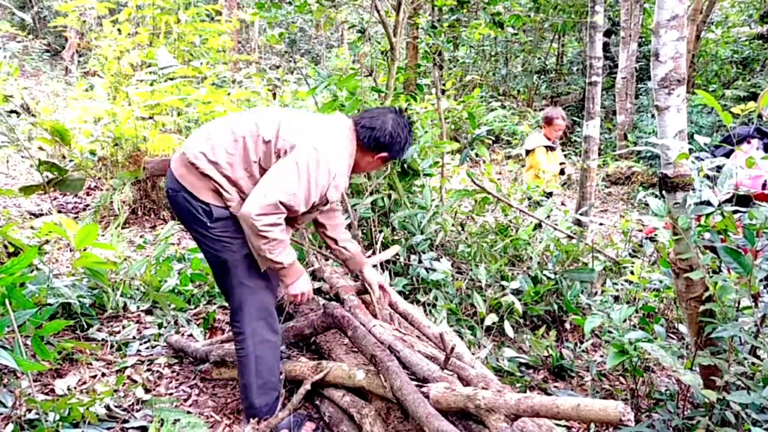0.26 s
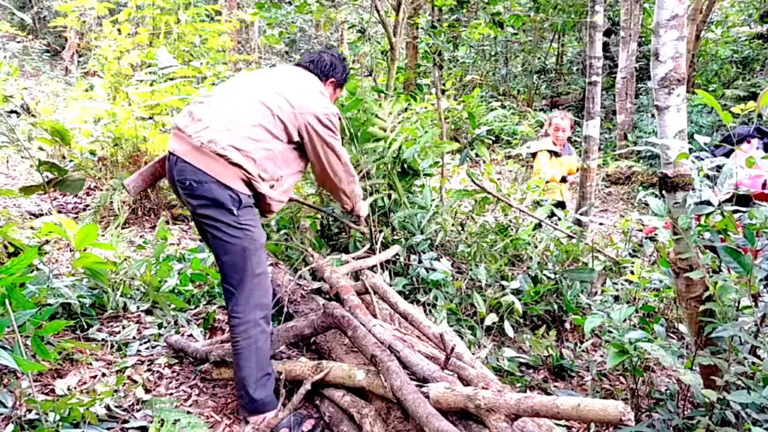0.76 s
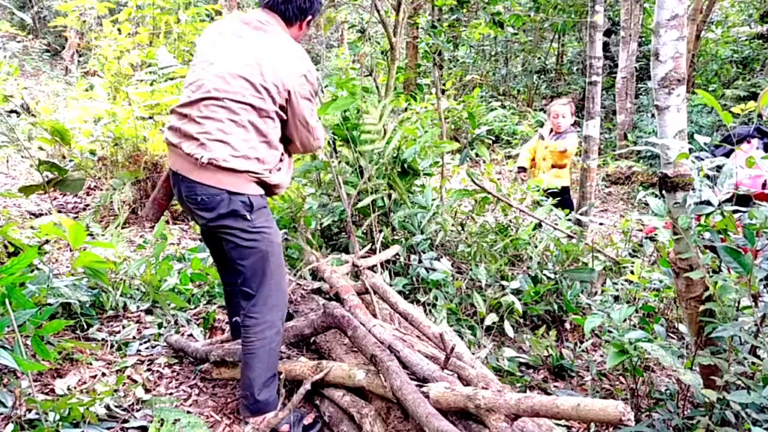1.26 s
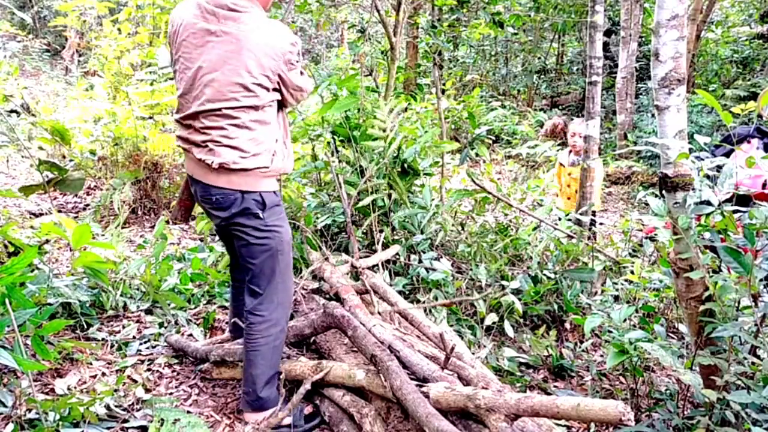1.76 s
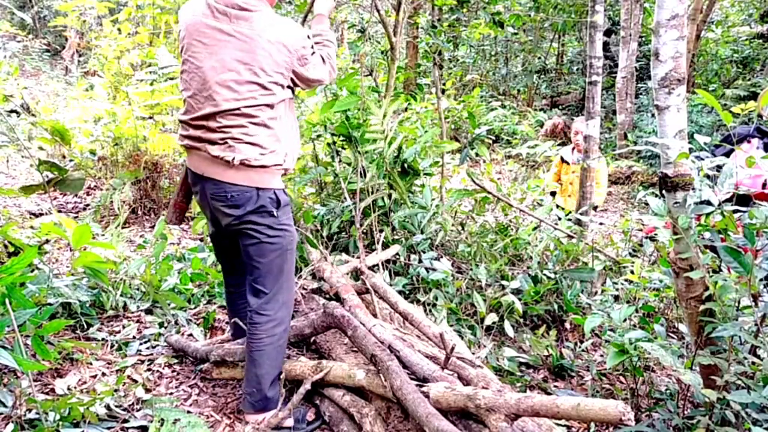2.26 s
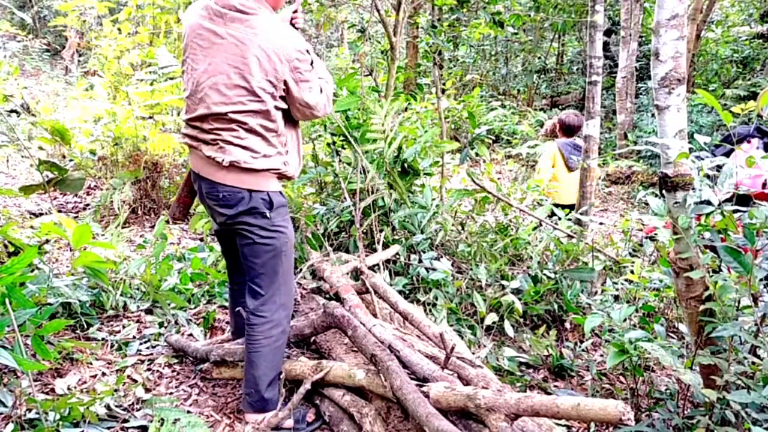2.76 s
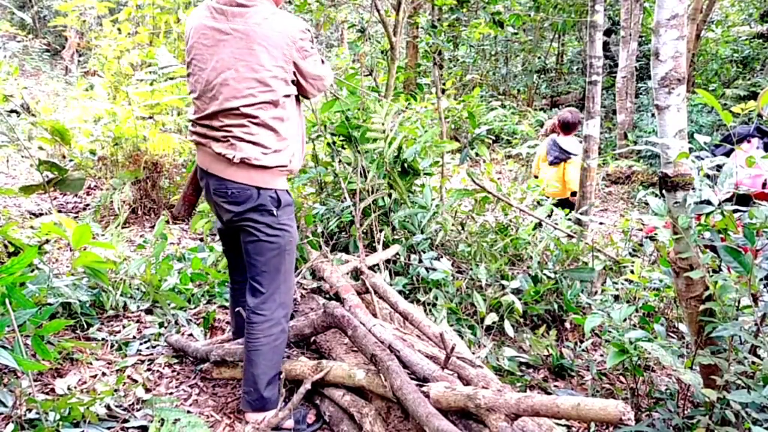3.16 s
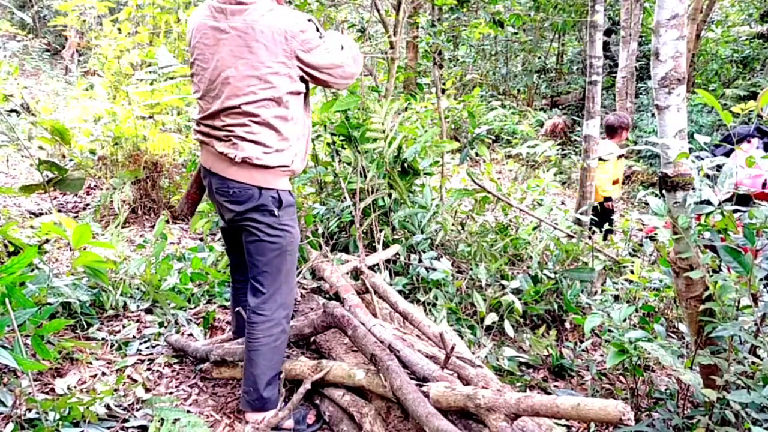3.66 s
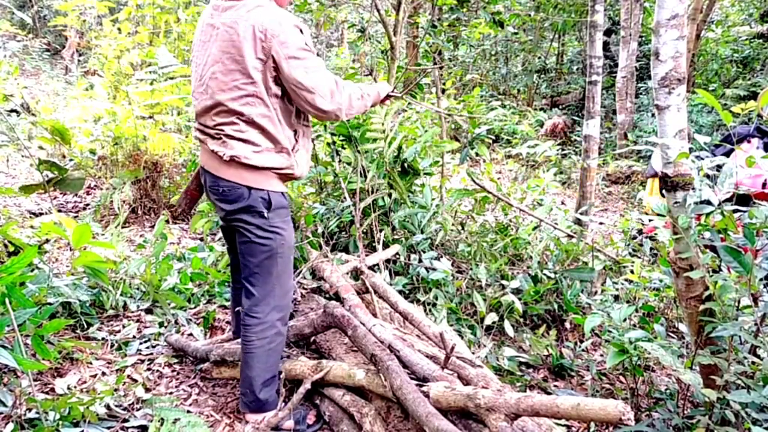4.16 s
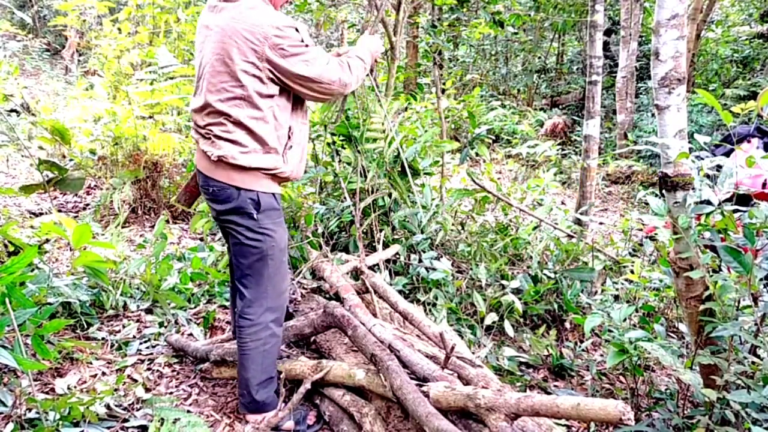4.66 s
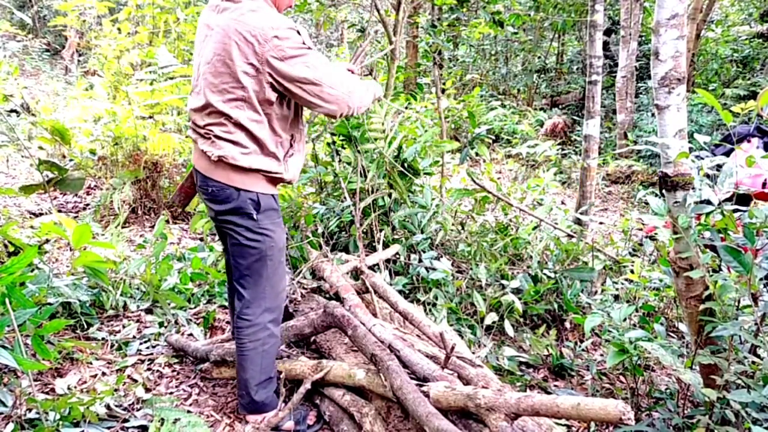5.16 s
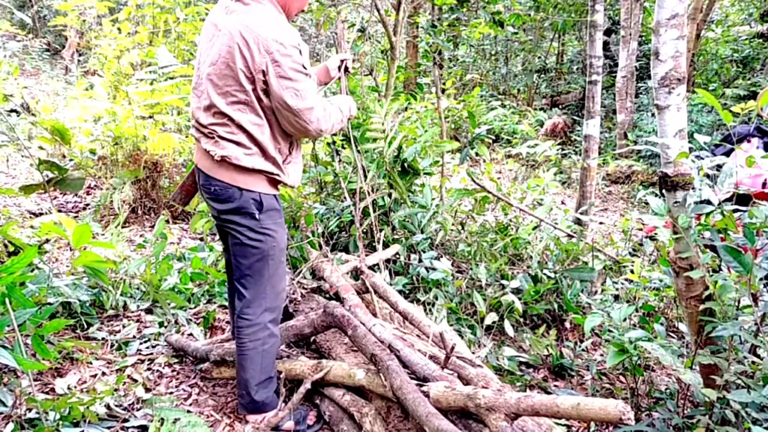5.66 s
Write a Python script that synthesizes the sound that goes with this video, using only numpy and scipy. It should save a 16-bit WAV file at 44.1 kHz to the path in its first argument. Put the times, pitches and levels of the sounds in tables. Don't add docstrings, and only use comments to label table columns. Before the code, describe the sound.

In a quiet forest, a few metres from a small microphone, dry sticks are pulled from a pile with small cracks, knocks and rustling leaves. Hard snaps burst out just before two seconds, side shoots are stripped, then a quiet stretch of faint creaks leads to the loudest break past four seconds. Bright thin snaps and a short swish follow.

```python
import sys
import numpy as np
from scipy import signal
from scipy.fft import rfft, irfft, next_fast_len
from scipy.io import wavfile
from scipy.ndimage import map_coordinates

SR = 44100
rng = np.random.default_rng(int(sys.argv[2]) if len(sys.argv) > 2 else 0)


def undo_db(level):
    steps = np.asarray(level, float) / 20
    return 10 ** steps


def generate_wav(signal):
    frames = np.transpose(np.atleast_2d(signal))
    scaled = np.clip(frames, -1, 1) * 32767
    pcm = np.round(scaled).astype(np.int16)
    wavfile.write(sys.argv[1], SR, pcm)


N = 261072


def unit(x):
    return x / np.sqrt(np.mean(x ** 2) + 1e-20)


def curves(rows):
    seconds, *columns = np.transpose(rows)
    t = np.arange(N) / SR
    return [np.interp(t, seconds, column) for column in columns]


def wobble(rate, count=N):
    knots = rng.standard_normal(size=count // 16)
    return map_coordinates(knots, [np.arange(count) * rate / SR + 2])


def filtered(x, response):
    size = next_fast_len(N + SR // 2)
    hz = np.fft.rfftfreq(size, 1 / SR)
    return irfft(rfft(x, size) * response(hz), size)[..., :N]


def coloured(spectrum):
    points_hz, points_db = np.transpose(spectrum)

    def response(hz):
        return undo_db(np.interp(np.log(hz + 1), np.log(points_hz), points_db))
    return unit(filtered(rng.standard_normal(N), response))


def band(x, peak_hz, width_hz, low_hz, high_hz, skirt=0.43):
    def edge(u):
        return 1 / (1 + np.sqrt(2) * u + u * u)

    def response(hz):
        f = hz + 1
        skirts = edge(low_hz / (1j * f)) ** 2 * edge(1j * f / high_hz) ** 2
        peak = 1j * f * width_hz / (peak_hz ** 2 - f * f + 1j * f * width_hz)
        return skirts * (skirt + peak)
    hz = np.fft.rfftfreq(4096, 1 / SR)[1:]
    return filtered(x, response) / np.sqrt(np.mean(np.abs(response(hz)) ** 2))


# time in seconds, strength in dB, share of bark rubbing on bark in dB.
STIR = [(0, -61, -1), (.48, -66.5, 1), (.6, -56, -5), (.81, -38, 0.5), (.94, -44.5, -3), (1.3, -44.5, 0),
        (1.6, -61.5, -4), (1.76, -47.5, -0.5), (2.21, -46, -3), (2.46, -55.5, 0.5), (2.6, -47, -4.5),
        (2.8, -61.5, 3), (2.92, -56.5, 1), (3.08, -70, 0.5), (4.3, -63.5, 2.5), (4.6, -63, -3.5),
        (5.05, -63, 1.5), (5.92, -65.5, -0.5)]
STIR_USUAL_DB = -55
# start in seconds, length in seconds, strength in dB.
BRUSHES = [(0.19, 0.14, -62), (1.351, 0.054, -43.5), (2.316, 0.052, -44), (2.4, .04, -49),
           (3.199, 0.062, -65.5), (3.37, .04, -63.5), (3.568, 0.062, -64), (3.764, 0.11, -64.5),
           (3.861, 0.062, -62.5), (4.035, 0.039, -69.5), (4.443, 0.098, -64), (4.61, 0.063, -61.5),
           (4.737, .09, -62), (5.433, 0.018, -52), (5.781, 0.077, -54.5)]


def stirring():
    t = np.arange(N) / SR
    brush = np.zeros(N)
    for start, length, db in BRUSHES:
        brush += undo_db(db) * np.sin(np.pi * np.clip((t - start) / length, 0, 1))
    stir = undo_db(curves(STIR)[0])
    return 10 * np.log10(stir ** 2 + brush ** 2) - STIR_USUAL_DB


# frequency in Hz, level in dB per Hz.
HISS = [(120, -27), (200, -6), (295, -7), (754, -5.5), (1700, -11), (2410, -10.5), (5520, -21),
        (14900, -13.5), (16400, -36)]


def forest():
    return undo_db(-69) * coloured(HISS)


# frequency in Hz, level in dB per Hz.
GROUND = [(15, 5.5), (30, -1), (60, -3.5), (125, -5.5), (250, -11.5), (400, -14), (800, -40)]


def rumble():
    level_db = -63.5 + 0.29 * stirring()
    unsteady_db = 2.5 + 1.4 * wobble(10) + 1.0 * wobble(18)
    return undo_db(level_db + unsteady_db) * coloured(GROUND)


# peak in Hz, width in Hz, low edge in Hz, high edge in Hz.
BANDS = [
    (14530, 3800, 16350, 15500),
    (7560, 1100, 4260, 7700),
    (2520, 2200, 1234, 5180),
    (860, 1000, 160, 3080),
]
# level in dB at usual stir, growth in dB per dB of stir, share of the bark dB.
LEAF_BANDS = [
    (-0.5, 1.0, -1),
    (-7.5, 1.12, -0.3),
    (-7, 1.086, 0.7),
    (-4, 0.66, 0.5),
]


def leaves():
    ticks = (rng.random(N) < 1100 / SR) * rng.exponential(size=N)
    tick_fade = np.exp(-np.arange(SR // 100) / SR / 0.00038)
    crackle = signal.fftconvolve(ticks, tick_fade)[:N]
    flicker = undo_db(1.1 * wobble(9) + 1.2 * wobble(28) + 1.5 * wobble(90))
    shared = flicker * (1 + 0.5 * np.minimum(crackle, 2.5))
    stir_db, bark_db = stirring(), curves(STIR)[1]
    out = np.zeros(N)
    for (db, growth, share), shape in zip(LEAF_BANDS, BANDS):
        layer = unit(shared * undo_db(1.4 * wobble(40))) * rng.standard_normal(N)
        level_db = STIR_USUAL_DB + db + growth * stir_db + share * bark_db
        out += undo_db(level_db) * band(layer, *shape)
    return out


# start in seconds, length in seconds, pitch in Hz, level in dB, fall of pitch in Hz per second.
SWINGS = [
    (4.475, .18, 2450, -64, 1350),
    (5.5, .12, 2250, -67, 500),
]


def swish():
    t, out = np.arange(N) / SR, np.zeros(N)
    eddy_hz = 330
    for start, length, hz, db, sag in SWINGS:
        swell = np.sin(np.pi * np.clip((t - start) / length, 0, 1)) ** 0.4 * (t < start + length)
        eddies = 1.0 + 1.3 * (wobble(eddy_hz) + 1j * wobble(eddy_hz))
        turns = np.cumsum(hz - sag * (t - start)) / SR
        out += swell * undo_db(db) * np.real(eddies * np.exp(2j * np.pi * turns))
    return out


# time in seconds, peak in dB, pitch in Hz.
THUDS = [(0.477, -54, 800), (0.618, -50, 560), (1.084, -35, 290), (1.085, -34, 720), (1.5765, -20, 760),
         (1.789, -42, 280), (1.862, -34, 820), (2.034, -47, 260), (2.286, -49, 270), (2.287, -46, 1050),
         (3.032, -44, 760), (4.97, -52, 600), (1.228, -48, 520), (1.5765, -33, 200), (1.79, -42, 480),
         (1.862, -38, 240), (1.864, -41, 520), (1.888, -40, 500), (1.902, -41, 300), (1.9125, -31, 300),
         (1.94, -39, 720), (2.034, -45, 480), (2.252, -51, 520), (2.286, -49, 500), (2.632, -54, 500),
         (3.037, -53, 400), (3.047, -51, 520), (4.137, -52, 420), (4.172, -26, 540), (4.196, -40, 400),
         (4.871, -47, 380), (4.8715, -48, 750), (4.912, -48, 300), (4.956, -46, 280), (5.195, -34, 520),
         (5.207, -52, 280), (5.557, -56, 300)]


def thuds():
    out, t = np.zeros(N + SR), np.arange(SR // 8) / SR
    for start, db, hz in THUDS:
        fade = undo_db(db - 60 * t / 0.03) * (1 - np.exp(-t / 0.0012))
        out[round(start * SR):][:len(t)] += fade * np.sin(2 * np.pi * hz * t)
    return out[:N]


# time in seconds, peak in dB, low tone in Hz, bending tone in Hz, bending tone in dB over the low one.
KNOCKS = [(0.126, -45, 960, 1600, -4), (0.6172, -40.5, 1450, 1530, -7), (1.0819, -22, 1750, 2900, -6.5),
          (1.083, -23, 1052, 2400, 3), (1.2282, -39, 264, 2370, -16), (1.3493, -37, 800, 3060, -5),
          (1.7887, -34, 715, 2190, 5), (1.7917, -26, 1134, 2220, -15), (1.9139, -23.5, 1030, 1590, -16),
          (2.0332, -38, 1540, 2700, -6), (2.2856, -38.5, 840, 1490, -4), (2.632, -39, 1460, 2370, 6),
          (2.678, -48, 1210, 2450, 14), (3.0365, -35.5, 1500, 2800, 0.5), (3.0433, -40, 840, 1650, 3),
          (3.4269, -54, 1050, 3070, 12), (4.7442, -50.5, 750, 2860, -6), (4.8, -49, 863, 1610, 1.5),
          (4.9118, -45.5, 850, 1750, -3), (5.3166, -47, 1090, 1650, 3), (5.4378, -36, 940, 2640, -12.5),
          (5.4411, -44, 305, 1675, 3.5), (5.5572, -44, 1390, 2290, 1), (5.9115, -35, 1110, 1600, -5)]
RECOILS = [(0.7984, -41, 1500, 2780, 4), (1.576, -14.5, 1010, 2500, 0), (1.5762, -17, 750, 1640, -10),
           (1.8276, -42, 1250, 2600, 15), (1.8644, -36, 850, 2520, 16.5), (1.8734, -40.5, 1500, 1600, 14),
           (1.8875, -30, 1520, 2400, 7), (1.893, -27.5, 893, 2658, 4), (2.7971, -42, 1010, 2640, 9),
           (4.1715, -21.5, 680, 2710, 9), (4.173, -25, 1430, 2500, 17), (4.8702, -43.5, 1510, 2000, 0),
           (4.955, -41, 1050, 2950, 11), (5.04, -54, 900, 2500, 6), (1.926, -46, 2700, 3200, 3),
           (4.1425, -44, 2000, 3550, 6), (4.186, -36, 1700, 2300, 2), (4.172, -26, 1850, 2390, 6),
           (1.5765, -27, 2130, 3320, -2), (5.176, -32.5, 636, 2450, 0), (5.1938, -24, 700, 1600, -5),
           (4.193, -45, 600, 1500, -10), (1.915, -39, 320, 400, -3), (1.8473, -40, 1400, 1880, 4.5),
           (4.137, -44.5, 760, 1140, 0), (1.3, -40, 1700, 3300, -10), (4.984, -42.5, 830, 4400, -3),
           (5.8863, -51, 1225, 1830, -4.5), (5.703, -51, 1130, 2060, -4)]


def knocks():
    out, rattle, t = np.zeros(N + SR), np.zeros(N + SR), np.arange(SR // 8) / SR
    for rows, t60 in [(KNOCKS, 0.024), (RECOILS, 0.022)]:
        for start, db, low_hz, bend_hz, bend_db in rows:
            fade = undo_db(db - 60 * t / t60) * (1 - np.exp(-(t / 0.00061) ** 2))
            low = np.sin(2 * np.pi * low_hz * t)
            bend = undo_db(bend_db) * np.sin(2 * np.pi * bend_hz * t + 2 * np.pi * rng.random())
            scatter = undo_db(db - 21 - 60 * t / 0.17)
            first = round(start * SR)
            out[first:][:len(t)] += fade * (low + bend)
            rattle[first:][:len(t)] += (undo_db(-12) * fade + scatter) * rng.standard_normal(len(t))
    return out[:N] + band(rattle[:N], 1000, 1300, 380, 2600)


# time in seconds, peak in dB, push time in seconds.
THUMP = (4.1715, -29.5, .0018)


def air_thump():
    start, db, push = THUMP
    u = np.clip(np.arange(N) / SR - start, 0, None) / push
    return -undo_db(db) * u * np.exp(1 - u)


# seconds to fall 60 dB, for the crisp, middle and wood bands.
SCATTER_T60 = [0.26, 0.33, 0.38]
# scatter change in dB, for the same bands.
SCATTER_TILT_DB = [-0.7, -0.75, -2]


def crack(force, start, db, wood_db, tear_ms, scatter_db, thin):
    t = np.arange(SR // 4) / SR
    t60, tilt_db = np.array(SCATTER_T60)[:, None], np.array(SCATTER_TILT_DB)[:, None]
    tear_fade = np.exp(-(t / (tear_ms / 900)) ** 1.7)
    tear = np.minimum(t / 0.00049, 1) * tear_fade * undo_db(1.9 * wobble(810, count=len(t)))
    tail_db = scatter_db + tilt_db - 60 * t / t60 + 2.1 * wobble(330, count=len(t))
    tail = undo_db(tail_db) * (1 + 1.4 * np.exp(-t / 0.016)) * (1 - np.exp(-t / 0.004))
    middle_db = -7 if thin else -3 + 0.29 * wood_db
    levels = undo_db(db + np.array([[1.1], [middle_db], [wood_db - 1.5]]))
    lanes = [0, 3 if thin else 1, 2]
    first = round(start * SR)
    force[lanes, first:first + len(t)] += levels * (tear + tail) * rng.standard_normal((3, len(t)))


# time in seconds, crisp band in dB,
# wood band in dB over the crisp one, tearing time in milliseconds, scatter in dB.
BREAKS = [(0.7425, -21.5, -19, .8, -15), (0.7577, -21, -14.5, 2.5, -4.5), (0.8016, -12.5, -15.5, 1.2, -22),
          (1.575, -21.5, 1, 1.3, -16.5), (1.577, -32.5, 8, 5.6, -21), (1.8275, -13.5, -11.5, 4.5, -12.5),
          (1.8597, -13.5, -9, 2.9, -19.5), (1.8628, -6, -16, 2.6, -14), (1.8692, -8, -19, 1.6, -16),
          (1.8872, -22, 3, 4.5, -17), (2.2335, -33, -1.5, 2.3, -14), (2.2385, -28.5, -8.5, 7.3, -10.5),
          (2.7695, -22, -17.5, 3.7, -18), (2.789, -26.5, -22, 3.5, -13), (2.796, -28.5, -29, 4.9, -7.5),
          (4.1352, -25, -12.5, 6.9, -22.5), (4.138, -10, -17, 1.0, -19), (4.1716, -5, -18.5, 4.2, -15.5),
          (4.1725, -4, -4.5, 3.3, -24), (4.182, -31, -4, 3.2, -22.5), (5.1468, -41, -12.5, 2.5, -3),
          (5.1585, -29, -20, 5, -8), (5.1646, -5, -20, 3.8, -19), (5.1933, -18.5, -10, 5, -22)]
SPLINTERS = [(1.8665, -12, -13, 2.2, -16), (1.875, -11, -17, 2, -15), (1.8805, -16, -16, 2, -18),
             (1.884, -16, -16, 1, -20), (4.8733, -17, -26, 2.2, -22), (4.8818, -25, -24, 1.5, -20),
             (4.9515, -33, -22, 4, -20), (4.144, -27, -16, 3, -14), (5.1702, -9, -28, 1.6, -20),
             (5.1727, -14, -33, 1, -22), (5.178, -19, -32, 3, -20), (5.1832, -20, -32, 2, -20),
             (5.2028, -20, -24, 2, -18)]
THIN = [
    (4.8711, -7.5, -22, 1.2, -27),
    (4.955, -49, -20, 2, -20),
    (4.9555, -10, -24, 1.33, -21),
]
PULLING = [(0.1244, -50.5, 0.5, 4.1), (0.419, -47.5, -4, 0.96), (0.4526, -46.5, -10, 8),
           (0.475, -35.5, -9, 4.5), (0.576, -49.5, 10, 0.54), (0.6142, -35.5, -1, 1.1),
           (0.64, -44, -2, 2.6), (0.7074, -48, -24, 3.2), (0.8519, -37, -16, 7.3), (0.878, -35, -3, 1.5),
           (1.082, -42, -4, 3), (1.1205, -43.5, 2, 3.1), (1.2183, -34.5, 5, 1.85), (1.294, -43, 2, 3),
           (1.348, -36, 2, 1.9), (1.3862, -40, -21, 3.7), (1.7886, -47, 4.5, 3.5), (0.085, -57.5, 4, 2),
           (0.117, -53, -5, 2), (0.7535, -34, -16, 5), (0.667, -43, -9, 2.5), (1.035, -55, -6, 1.3),
           (1.8006, -57, -2, 1)]
STRIPPING = [(1.922, -32, -16, 6.9), (1.9834, -22.5, -11, 0.92), (2.0327, -31, 4, 2),
             (2.1253, -33.5, -8, 3), (2.1695, -33, -15, 7.8), (2.2852, -32.5, -6.5, 2.1),
             (2.326, -49, 1, 3.3), (2.336, -48, 9, 8.3), (2.42, -36.5, -10.5, 6.6), (2.4774, -45, -16, 3),
             (2.522, -37, -14, 4.8), (2.567, -41.5, 1.5, 5.3), (2.5902, -32, -8, 2.3),
             (2.604, -37, -6.5, 4.2), (2.6315, -38.5, -1.5, 5.3), (2.68, -39, 3, 4),
             (2.7464, -50, -26, 0.73), (2.8197, -38.5, 6, 1.6), (2.8439, -36, -9.5, 7),
             (2.8862, -39, -4, 1.2), (2.9606, -57, 6, 1.3), (3.0008, -32.5, -12.5, 4.7),
             (3.0305, -37, -2, 4.5), (3.036, -37.5, 0, 1.9)]
GRIPPING = [(3.2039, -55.5, 5.5, 1.2), (3.374, -55.5, 1.5, 1.4), (3.429, -60.5, 10.5, 3.9),
            (3.8766, -57, 4.5, 1.5), (3.8992, -46.5, -15, 2.2), (4.046, -48.5, -5.5, 3.3),
            (4.1495, -26, -18, 3.3), (4.4674, -51.5, 6, 0.72), (4.5511, -62, 10, 2.4),
            (4.6163, -58, -10.5, 6.1), (4.766, -45, -3.5, 1.2), (4.8001, -56, -11, 7.2),
            (4.8187, -61, 2, 7), (4.907, -45, -10, 4.9), (5.3162, -63.5, 11, 3.2), (5.442, -48.5, 0, 6.1),
            (5.5139, -57, 5, 6), (5.5569, -46, 3.5, 4.1), (5.6993, -46, -25, 1.8),
            (5.7964, -34.5, -20, 3.4), (5.8746, -49.5, 4.5, .86), (5.9007, -50, -7, 4.8),
            (3.2953, -64.5, 6.5, 2.5), (4.002, -54.5, -21, 1), (5.713, -54, -25, 1.5), (4.028, -59, 4, 2),
            (4.4448, -59, 3, 1), (4.635, -58, -4.5, 4.8), (5.045, -43, -2.5, 2.2)]
# peak in Hz, width in Hz, low edge in Hz, high edge in Hz.
WOOD_BAND = (2520, 1500, 1650, 5180)


def snaps():
    force = np.zeros((4, N + SR))
    for row in [*BREAKS, *SPLINTERS]:
        crack(force, *row, thin=False)
    for row in THIN:
        crack(force, *row, thin=True)
    for rows, scatter_db in [(PULLING, -16.5), (STRIPPING, -16), (GRIPPING, -16.5)]:
        for row in rows:
            crack(force, *row, scatter_db, thin=False)
    thin_band = (6470, 2500, 5940, 8200)  # peak, width, low and high edge in Hz
    shapes = [*BANDS[:2], WOOD_BAND, thin_band]
    return sum(band(x[:N], *shape) for x, shape in zip(force, shapes))


def scene():
    background = forest() + rumble() + leaves()
    handling = swish() + thuds() + knocks()
    return (background + handling + air_thump() + snaps())[None]


def roll_off(x):
    return signal.sosfilt(signal.butter(12, 16510, fs=SR, output="sos"), x)


def record(dry):
    bent = dry - 0.035 * np.minimum(dry ** 2, 1)
    clipped = bent / (1 + np.abs(bent / 1.2) ** 8) ** (1 / 8)

    def treble_end(hz):
        return undo_db(-np.clip((hz - 15500) / 12, 0, 42) - np.clip((hz - 16300) / 8, 0, 60))
    mic = filtered(clipped, treble_end)
    return roll_off(np.clip(mic, -1, 1))


dry = scene()
out = record(dry)
generate_wav(out)
```